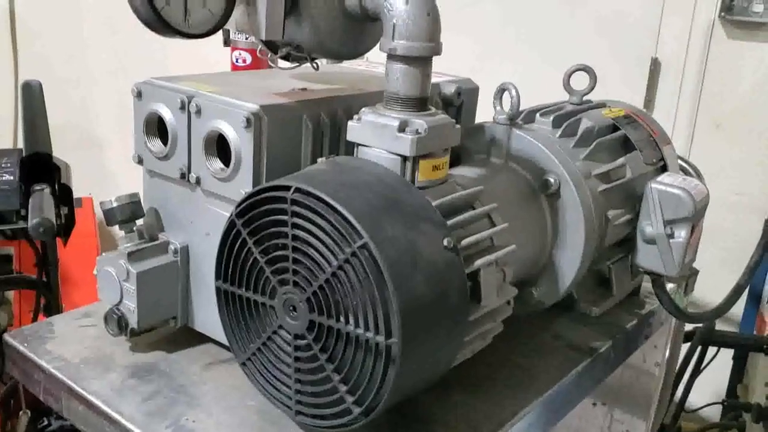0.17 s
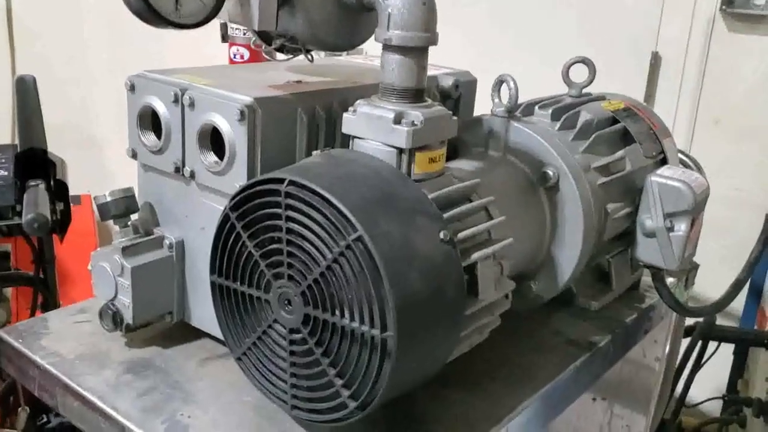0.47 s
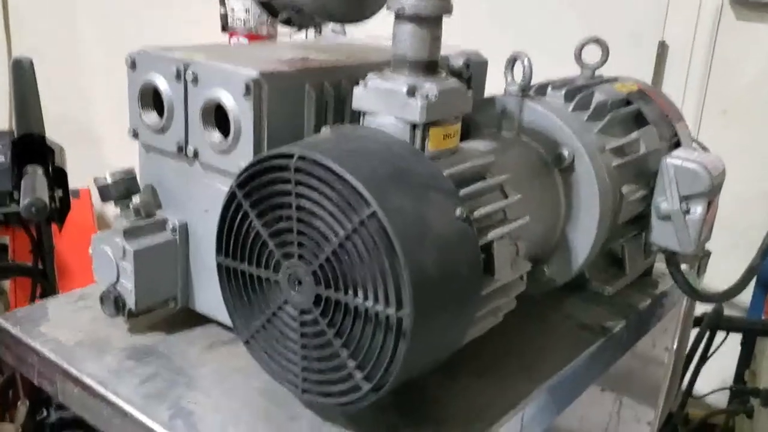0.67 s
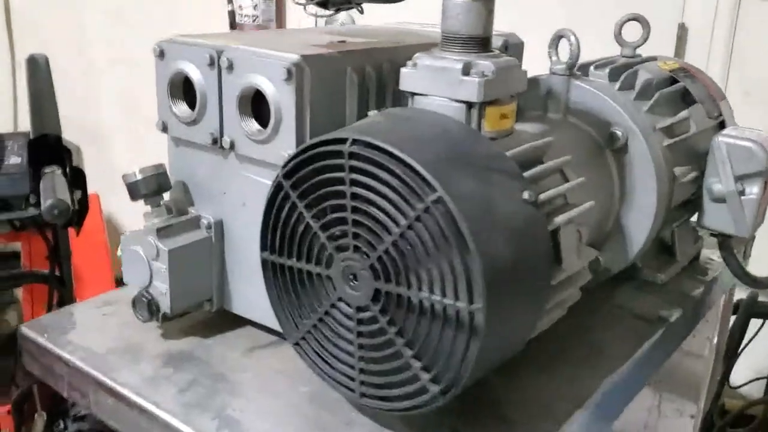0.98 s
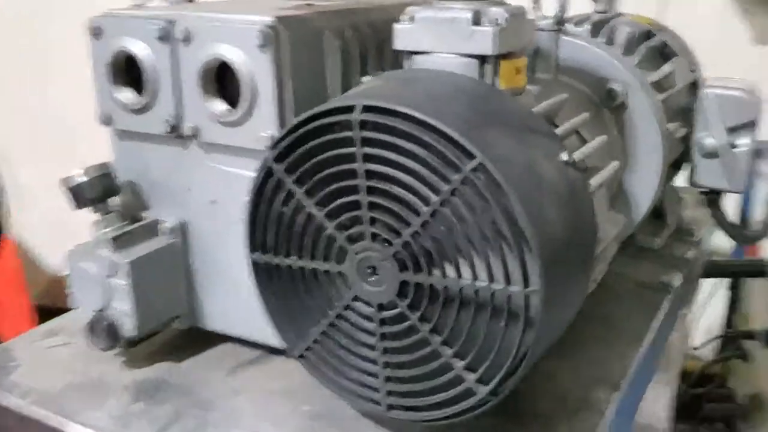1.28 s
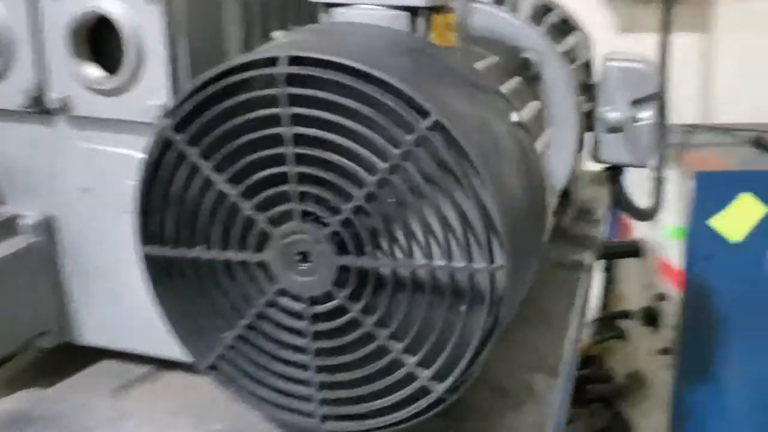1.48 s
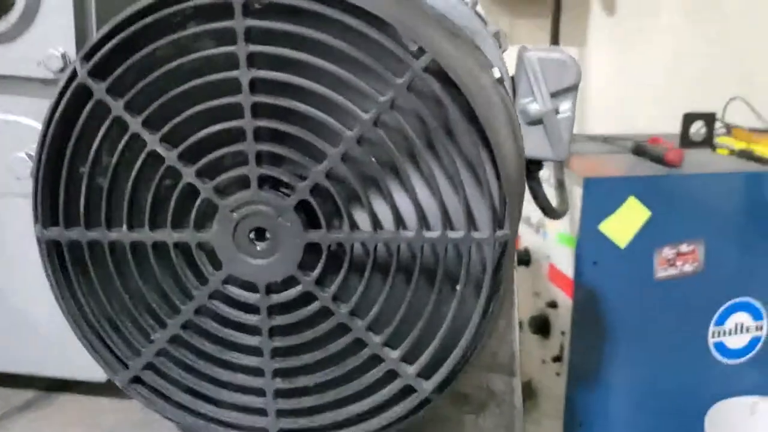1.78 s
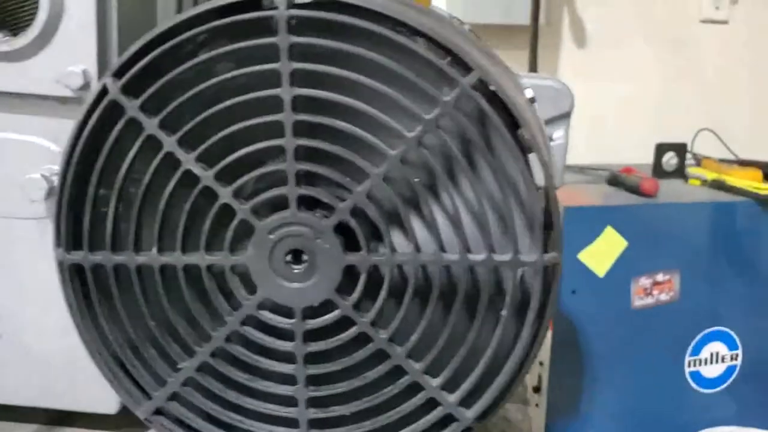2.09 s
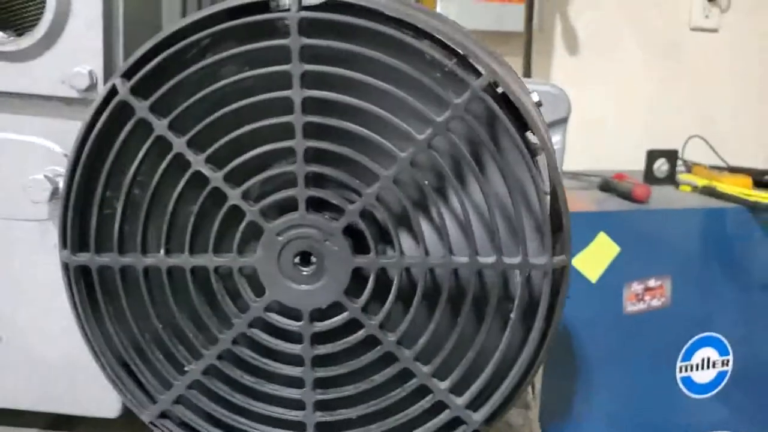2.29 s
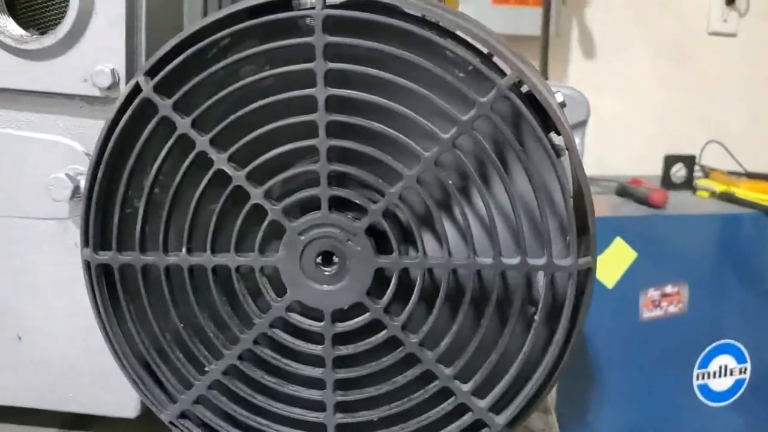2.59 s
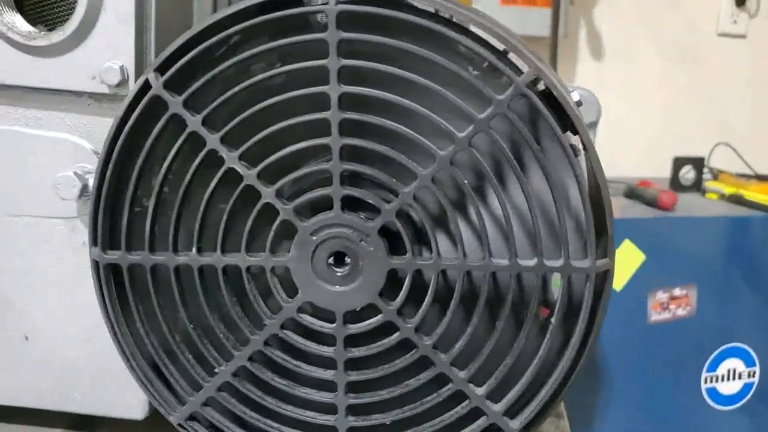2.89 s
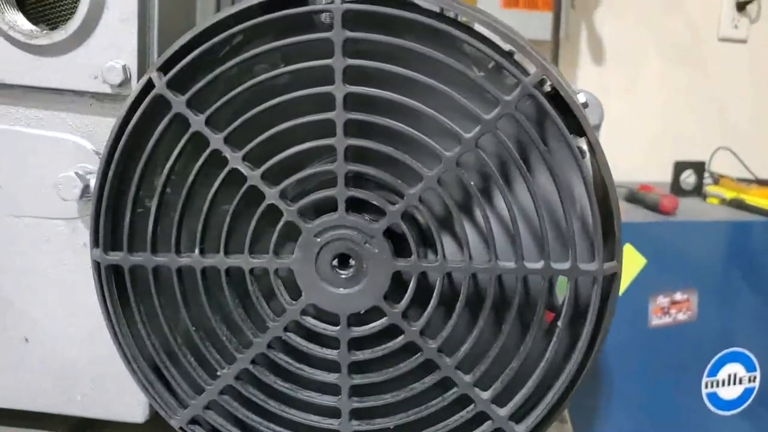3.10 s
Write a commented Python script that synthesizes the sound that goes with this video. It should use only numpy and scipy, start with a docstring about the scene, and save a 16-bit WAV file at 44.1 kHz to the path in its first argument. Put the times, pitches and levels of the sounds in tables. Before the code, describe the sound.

An industrial vacuum pump hums, clatters and rushes with fan air, growing louder as it nears.

```python
"""A rotary-vane vacuum pump, already running on a steel bench in a workshop, cuts in abruptly.
At first it is heard from afar: the shaft hums in harmonics, three vanes knock in the casing on every
turn over a loose clatter, and the eight-bladed fan drones and rushes. From about 0.9 s the microphone
moves up to the fan guard, and hard knocks come more often. From about 2 s it stays near the guard,
where the fan is louder and brighter."""
import sys
import numpy as np
from scipy import signal
from scipy.fft import rfft, irfft, next_fast_len
from scipy.io import wavfile

SR = 44100
rng = np.random.default_rng(int(sys.argv[2]) if len(sys.argv) > 2 else 0)


def unload_audio(sound):
    """Save the sound as a 16-bit wav file, at the path given as the first command line argument."""
    columns = np.transpose(np.atleast_2d(sound))
    # keep every value between -1 and 1, then stretch to whole-number steps
    steps = np.round(np.clip(columns, -1, 1) * 32767)
    wavfile.write(sys.argv[1], SR, steps.astype(np.int16))


N = 142884

SHAFT_HZ, BLADES = 29.69, 8
WAVER_DB, WAVER_HZ = 1.64, 4.8

# Strong shaft harmonics: shaft_multiple, far_db, near_db
HARMONICS = [(3, -54, -51), (4, -69, -59), (6, -56, -45.5), (8, -54, -37.5), (9, -47.5, -47.5),
             (10, -60.5, -51.5), (12, -54.5, -47.5), (13, -56, -57.5), (14, -69, -53), (15, -57.5, -42),
             (16, -47.5, -35), (17, -48, -43), (21, -51.5, -57.5), (22, -50.5, -65), (23, -54.5, -60.5),
             (24, -41.5, -39.5), (29, -49.5, -44.5), (30, -57, -56), (32, -42, -34), (33, -64, -42.5),
             (36, -47, -52.5), (40, -45, -39.5), (42, -45, -45.5), (43, -51.5, -50.5), (47, -59.5, -54),
             (48, -48, -46.5), (50, -44.5, -53), (51, -44, -51.5), (54, -51, -46.5), (60, -56.5, -52),
             (71.06, -58, -44.5)]
# Vane knocks within one rotation: place_turns, relative_db
VANE_KNOCKS = [(.12, -10), (0.454, -5.5), (.80, -10.5)]
# The hardest knocks: start_s, relative_db
HARD_KNOCKS = [(0.4204, -22), (1.262, -13), (1.329, -20), (1.699, -15.5), (1.7110, -14.5), (1.7329, -12.5),
               (2, -21), (2.036, -13), (2.0697, -14.5), (2.1031, -13), (2.1368, -13.5), (2.2375, -16.5),
               (2.607, -14.5), (2.9785, -17)]
# Force of the vane knocks and clatter: time_s, gain_db
KNOCK_FORCE = [(.13, -1), (.55, 1), (.68, 1.5), (.82, 0), (1.1, 0), (1.28, 3), (1.5, 0.5), (1.9, -1.5),
               (2.25, 3), (2.55, 2), (2.75, 0.5), (3.02, 2), (3.24, 2)]
# Modes of the casing: pitch_hz, relative_db, t60_s
CASING_MODES = [(700, -13.5, 0.013), (941, -11, 0.052), (1070, -6, 0.0089), (1254, 0.5, 0.027),
                (1485, -3, .032), (1526, -7.5, .032), (1650, -14, 0.024), (1975, -5.5, .025),
                (2214, -10, 0.081), (3560, -18.5, 0.013), (6360, -23, 0.0038)]
# Spectrum of the air rush from afar: frequency_hz, relative_db
RUSH_FAR = [(15, -45.5), (50, -20.5), (90, -11.5), (150, -3.5), (330, -2.5), (550, 0), (850, 4),
            (1500, -4.5), (1800, -4), (2300, -2.5), (2500, -11.5), (3700, -7.5), (4600, -17.5),
            (6400, -12.5), (7300, -23.5), (9800, -20.5)]
# The same at the guard: frequency_hz, relative_db
RUSH_NEAR = [(15, -26), (55, -8.5), (90, 0.5), (150, -5.5), (200, 0), (350, -5), (490, 6), (600, -0.5),
             (950, 2), (1450, 1.5), (2250, -3.5), (2550, -8), (3400, -9), (5000, -14), (6600, -13.5),
             (7300, -30), (7900, -23.5), (9800, -18.5)]
# Resonances that colour the rush: centre_hz, half_width_hz, far_lift_db, near_lift_db
RUSH_RESONANCES = [(1225, 34, 8.5, 6.5), (1540, 35, 6, 6), (2225, 69, -0.5, 6), (2720, 14, 9.5, 7.5),
                   (3020, 53, 0, 2.5), (3350, 140, 3.5, 4.5), (3715, 20, 10, 3.5), (3985, 53, 4, 6.5),
                   (4445, 24, 7.5, 5.5), (4670, 60, 3, 5), (4995, 35, 3, 9.5), (5270, 32, 1, 8),
                   (5680, 11, 10.5, 8), (6540, 70, 3.5, 0), (7780, 110, -3.5, 7.5)]
# Fan swish and metallic chatter: centre_hz, half_width_hz, place_turns, sharpness, far_db, near_db
BURST_BANDS = [(496, 84, 0.14, 0.3, -55.5, -43), (2257, 55, 0.87, 1.7, -51.5, -39.5)]
# Tones just below the third shaft harmonic: pitch_hz, level_db
BEATING_TONES = [(71.8, -56), (81.3, -52)]
# The microphone's walk: time_s, nearness (0 afar, about 1 at the guard)
APPROACH = [(.13, 0), (.7, 0.01), (.9, 0), (1.1, 0.32), (1.3, 0.52), (1.55, 0.75), (1.9, 0.89),
            (2.15, 1.02), (2.42, 0.84), (2.7, 0.96), (3.0, 1.02), (3.24, 0.97)]
# Microphone pair: frequency_hz, correlation, far_left_minus_right_db, near_left_minus_right_db
MIC_PAIR = [(70, 0.86, -1.7, .8), (232, 1, 0, 5.1), (480, 0.4, 4, 4.1), (830, 0.9, 3.5, 5.7),
            (1400, 0, 5, 0.94), (2100, 0.39, 5, 2.2), (3200, 0, 6, 7.8), (4760, .15, 3.5, 7.3),
            (6300, 0, 13.5, 9.4), (8460, .05, -1.5, 2)]


def shaft_hum(turns, near):
    """Periodic motion gives a harmonic series; the first blade-passing tones swell up close."""
    crest_turns, spread_rad_per_khz = 0.05064, 0.56
    out = np.zeros((2, N))
    for multiple, far_db, near_db in HARMONICS:
        k = round(multiple)
        level = amp(far_db + (near_db - far_db) * near + WAVER_DB * drift(WAVER_HZ))
        loose = abs(k - 2 * BLADES) > 2  # those around the second blade tone crest together
        phase = 2 * np.pi * (k * (turns - crest_turns) + loose * rng.random())
        spread = spread_rad_per_khz * k * SHAFT_HZ / 1000 * drift(rate_hz=0.84) / 2
        out += np.sqrt(2) * level * np.sin([phase + spread, phase - spread])
    return out


def blows(near):
    """Impact excitation: three uneven vane knocks a turn, random clatter and a few hard knocks."""
    jitter_s, vane_scatter_db, clatter_per_s, clatter_scatter_db = .00045, 3.5, 420, 3
    turn = np.arange(int(N / SR * SHAFT_HZ) + 1)
    vanes = np.zeros(N)
    for place, db in VANE_KNOCKS:
        late, size = rng.standard_normal((len(turn), 2)).T
        times = (turn + place) / SHAFT_HZ + jitter_s * late
        vanes += impulses(times, db + vane_scatter_db * np.minimum(size, 1))
    ticks = (rng.random(N) < clatter_per_s / SR) * rng.choice([-1, 1], N)
    clatter = ticks * amp(clatter_scatter_db * np.minimum(rng.standard_normal(N), 2))
    steady = vanes * amp(-5 + 2 * near) + clatter * amp(-20 + 3.5 * near)
    hard_s, hard_db = np.transpose(HARD_KNOCKS)
    return amp(over_time(KNOCK_FORCE)) * steady + impulses(hard_s, hard_db + 13.5)


def casing(drive):
    """Modal response: each blow gives a short crack and rings the damped modes of the cast casing."""
    crack_db, crack_decay_s, crack_hz = 11, 0.00065, 1355
    t = np.arange(4096) / SR
    ring = sum((-1) ** k * amp(db - 60 * t / t60) * np.sin(2 * np.pi * hz * t)
               for k, (hz, db, t60) in enumerate(CASING_MODES))
    ring += amp(crack_db) * np.exp(-t / crack_decay_s) * np.sin(2 * np.pi * crack_hz * t)
    return signal.oaconvolve(drive, ring / np.linalg.norm(ring))[:N]


def fan_air(turns, near):
    """Amplitude modulation: the passing blades chop the fluttering rush through the guard."""
    chop_depth, flutter_db = 0.067, .8
    far = amp(-36) * rush(RUSH_FAR, lift_column=2) * np.sqrt(1 - np.clip(near, 0, 1) ** 2)
    close = amp(-28.5) * rush(RUSH_NEAR, lift_column=3) * near
    chop = 1 + chop_depth * np.cos(2 * np.pi * BLADES * turns)
    return (far + close) * chop * amp(flutter_db * drift(rate_hz=70))


def rush(spectrum, lift_column):
    """Resonance lifts narrow peaks out of broadband air noise."""
    def colour(hz):
        lift_db = sum(row[lift_column] / (1 + ((hz - row[0]) / row[1]) ** 2) for row in RUSH_RESONANCES)
        return amp(over_frequency(spectrum, hz) + lift_db)
    return stereo_noise(colour)


def swish_and_chatter(turns, near):
    """Periodic gating: narrow bands of noise swell at one place in every turn."""
    out = np.zeros((2, N))
    for centre, width, place, sharpness, far_db, near_db in BURST_BANDS:
        gate = unit_rms(np.exp(sharpness * np.cos(2 * np.pi * (turns - place))))
        band = stereo_noise(lambda hz: 1 / (1 + ((hz - centre) / width) ** 4))
        out += amp(far_db + (near_db - far_db) * near) * gate * band
    return out


def throb(t):
    """Beating: two low tones interfere with each other and the third harmonic, so the bass pulses."""
    out = np.zeros(N)
    for hz, db in BEATING_TONES:
        level = amp(db + WAVER_DB * drift(WAVER_HZ))
        out += np.sqrt(2) * level * np.sin(2 * np.pi * (hz * t + rng.random()))
    return out


def workshop(direct, t60_s=0.22, tail_db=-4.5):
    """Reverberation: sparse reflections follow the direct sound, different at each microphone."""
    t = np.arange(SR // 2) / SR
    reflections = rng.standard_normal((2, len(t))) * (rng.random((2, len(t))) < .1)
    tail = reflections * amp(-60 * t / t60_s)
    tail /= np.linalg.norm(tail, axis=1, keepdims=True)
    return direct + amp(tail_db) * signal.fftconvolve(direct[None], tail, axes=1)[:, :N]


def stereo_noise(colour):
    """Partial coherence: the two microphones share only part of a coloured noise."""
    size = next_fast_len(N, real=True)
    hz = np.fft.rfftfreq(size, 1 / SR)
    left, independent = rfft(rng.standard_normal((2, size)))
    correlation = np.clip(over_frequency(MIC_PAIR, hz), -1, 1)
    right = correlation * left + np.sqrt(1 - correlation ** 2) * independent
    return unit_rms(irfft(np.array([left, right]) * colour(hz), size)[:, :N])


def drift(rate_hz):
    """Low-pass filtering turns noise into a random wander of rms about 1."""
    hz = np.fft.rfftfreq(4096, 32 / SR)
    slow = unit_rms(irfft(rfft(rng.standard_normal(4096)) / (1 + (hz / rate_hz) ** 2)))
    return np.interp(np.arange(N) / 32, np.arange(4096), slow, period=4096)


def impulses(times, db):
    """Ideal impacts, one sample each."""
    at = np.round(times * SR).astype(int)
    inside = (at >= 0) & (at < N)
    return np.bincount(at[inside], amp(db)[inside], N)


def over_time(table):
    """Linear interpolation at every sample."""
    return np.interp(np.arange(N) / SR, *np.transpose(table))


def over_frequency(table, hz, column=1):
    """Interpolation along log frequency."""
    table = np.array(table)
    return np.interp(np.log(hz + 1), np.log(table[:, 0] + 1), table[:, column])


def amp(db):
    """Decibels to amplitude ratio."""
    return 10 ** (np.asarray(db) / 20)


def unit_rms(x):
    """Normalisation to rms 1."""
    return x / np.sqrt(np.mean(x ** 2) + 1e-20)


def scene():
    """Superposition: the sounds of pump and fan add along one approach."""
    walk_m, sound_m_per_s, wobble_turns = 0.2, 343, 0.0023
    t, near = np.arange(N) / SR, over_time(APPROACH)
    lead_s = walk_m * near / sound_m_per_s  # a shorter path advances the phase
    turns = SHAFT_HZ * (t + lead_s) + wobble_turns * drift(WAVER_HZ)
    pump = shaft_hum(turns, near) + workshop(casing(blows(near)))
    return pump + fan_air(turns, near) + swish_and_chatter(turns, near) + throb(t)


def record(dry):
    """Level difference: the left side mostly leads as the walk goes on; sound cuts in, band-limited."""
    start_s, cutoff_hz = .127, 9950
    hz, near = np.fft.rfftfreq(N, 1 / SR), np.clip(over_time(APPROACH), 0, 1)
    leans_db = [over_frequency(MIC_PAIR, hz, column) for column in (2, 3)]
    far, close = [irfft(rfft(dry) * amp([db / 2, -db / 2]), N) for db in leans_db]
    heard = (far * (1 - near) + close * near) * (np.arange(N) / SR > start_s)
    lowpass = signal.firwin(511, cutoff_hz, window=("kaiser", 9), fs=SR)
    return signal.oaconvolve(heard, lowpass[None], "same")


dry = scene()
out = record(dry)
unload_audio(out)
```